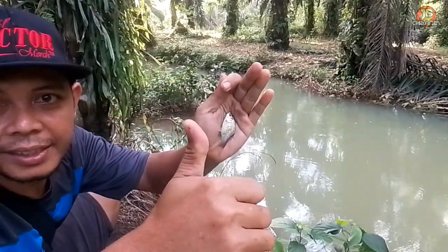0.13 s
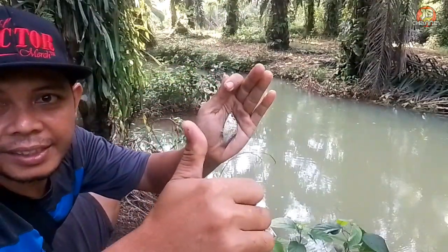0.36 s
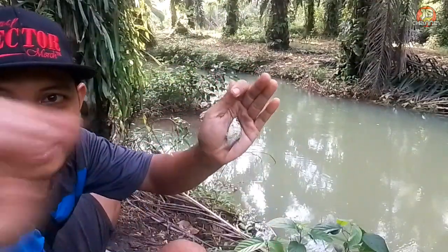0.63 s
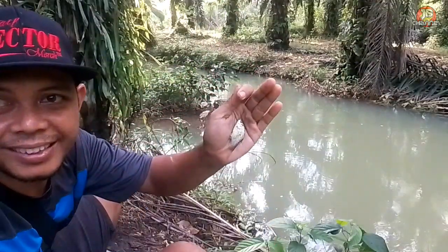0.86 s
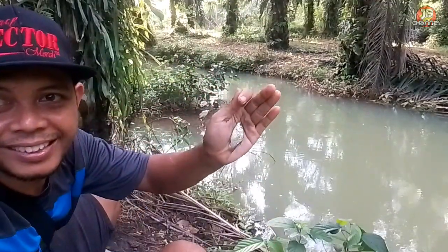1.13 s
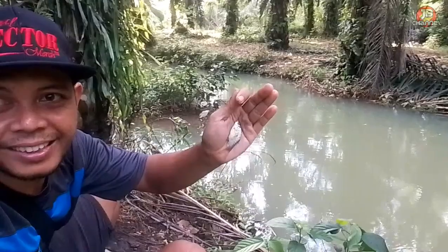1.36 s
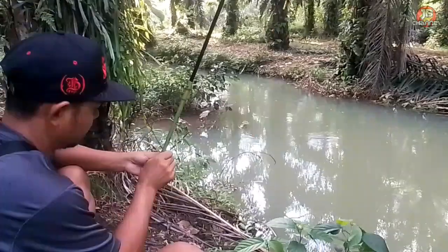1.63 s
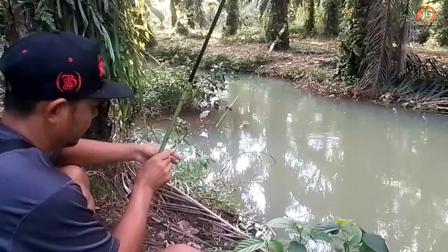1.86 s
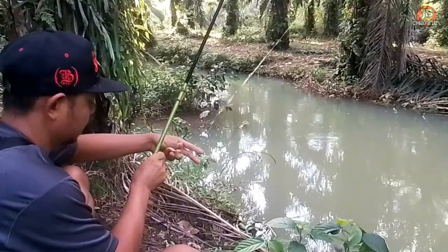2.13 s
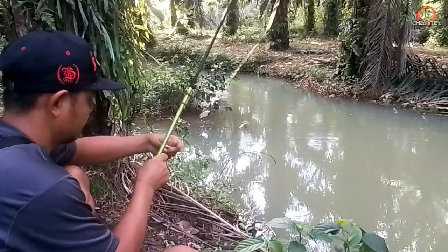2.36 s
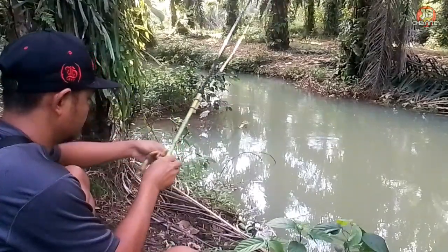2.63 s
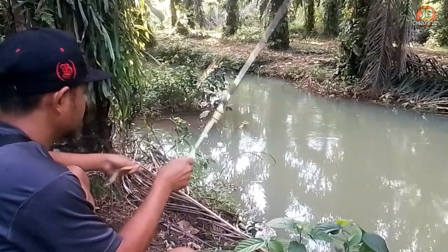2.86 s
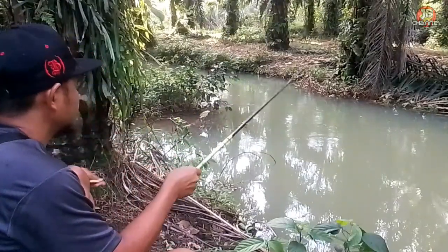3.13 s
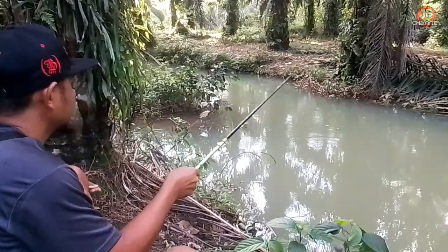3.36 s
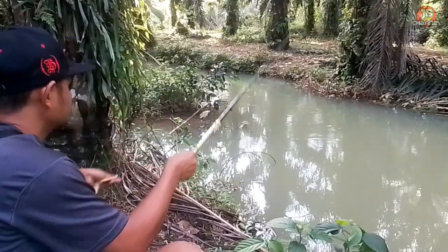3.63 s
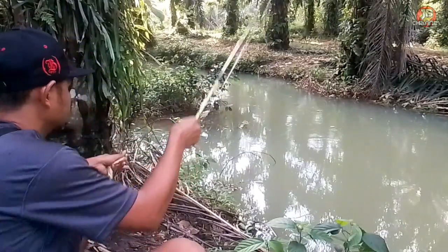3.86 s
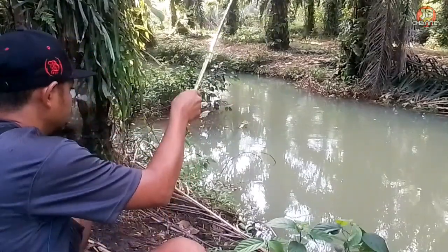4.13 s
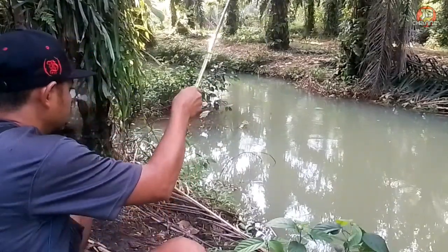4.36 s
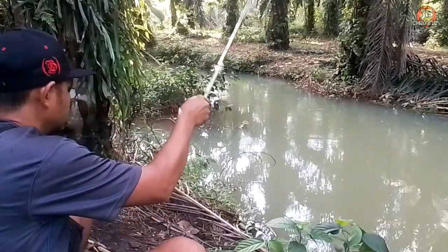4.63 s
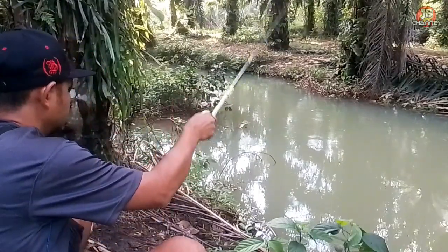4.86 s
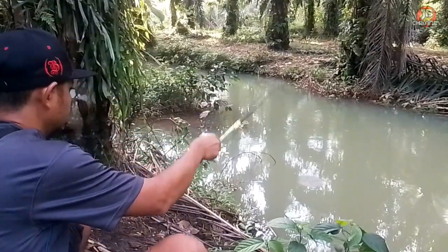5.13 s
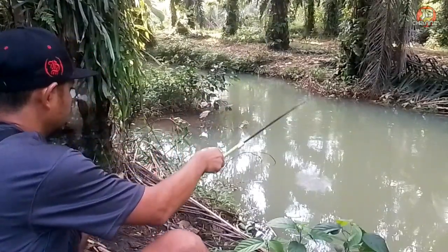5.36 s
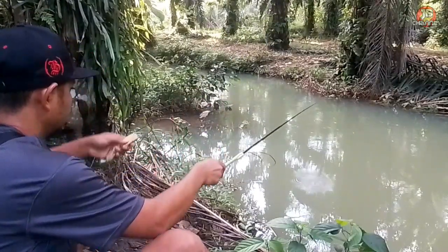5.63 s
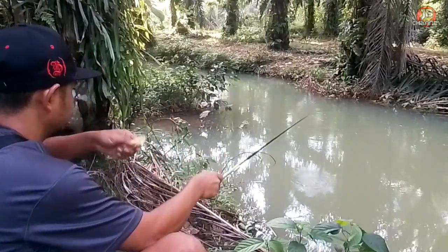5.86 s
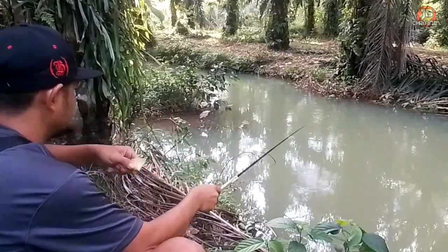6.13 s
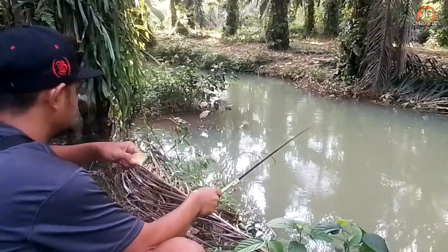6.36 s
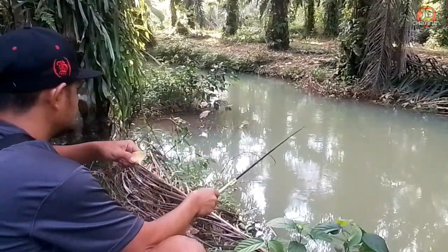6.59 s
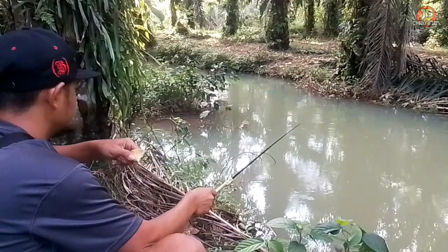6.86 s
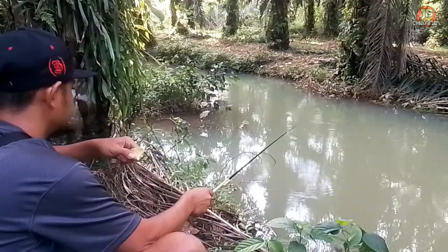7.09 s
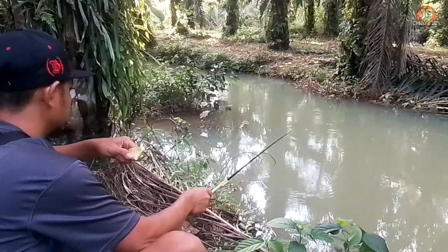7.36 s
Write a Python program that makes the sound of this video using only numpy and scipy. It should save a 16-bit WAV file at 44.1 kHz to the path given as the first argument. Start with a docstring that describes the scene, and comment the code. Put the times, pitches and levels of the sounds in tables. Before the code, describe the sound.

Daytime grove beside slow water: a pulsing cicada band, high buzz and fine cricket trill run throughout over soft air and low wind. Early, quick falling chirps and a hoarse far fowl; handling knocks and a low bump come just before a brief silent cut. The chorus fades back in with regular rising peeps and echoing far bird notes. Fishing-rod taps and rustle close near the microphone.

```python
"""Daytime grove by a slow stream

Cicadas and crickets sing in steady bands, made of pulsed noise rung by body resonances and of combs of close lines.
Small callers peep and chirp as gliding tones or blurred notes, and a far fowl crows in hoarse harmonics; all echo
off the trunks. Shaped noise makes air, far water and wind. A hand bumps, taps and rustles near the microphone as
short rings, pushes and noise grains. An edit cuts to silence and fades in."""
import sys
import numpy as np
from scipy import signal
from scipy.fft import rfft, irfft, next_fast_len
from scipy.io import wavfile
from scipy.ndimage import uniform_filter1d

SR = 44100
rng = np.random.default_rng(int(sys.argv[2]) if len(sys.argv) > 2 else 0)


def master(y):
    """Save y as 16-bit WAV."""
    cut = np.clip(np.atleast_2d(y).T, -1, 1)
    pcm = np.round(cut * 32767)  # scale
    wavfile.write(sys.argv[1], SR, pcm.astype(np.int16))


def undo_db(level):
    """Turn decibels back into plain size, where 20 dB means ten times bigger."""
    steps = np.asarray(level, float) / 20
    return 10 ** steps


N = 329906
T = np.arange(N) / SR
CUT_S = 1.4506  # the edit's hard cut

# singers' levels, a row before and a row after the cut:
# (cicadas [dB], their overtone [dB], high buzz [dB], crickets [dB], far chorus [dB])
SINGER_LEVELS = [(-62.5, -84.5, -68, -74, -70.5), (-61.5, -81.5, -67.5, -70.5, -72)]


def evened(x):
    """Scales to rms 1."""
    return x / np.sqrt(np.mean(x ** 2) + 1e-20)


def add(mix, s, sound):
    """Mixes a sound in at time s."""
    part = mix[round(s * SR):][:len(sound)]
    part += sound[:len(part)]


def curve(rows):
    """Straight lines through a table of (time [s], value)."""
    return np.interp(T, *np.transpose(rows))


def across_cut(table, column):
    """One column of a two-row table: first row before the cut, second after."""
    return np.where(T < CUT_S, table[0][column], table[1][column])


def bout(s, hold, db, rise, fall):
    """Gain that rises to db at time s, holds, and dies away; rise and fall are seconds per 60 dB."""
    late = np.maximum((s - T) / rise, (T - s - hold) / fall)
    return undo_db(db - 60 * np.maximum(0, late))


def slow(top_hz):
    """Slow chance of rms 1: sines from 0.1 Hz to top_hz, weaker as they quicken."""
    t = T[::64]
    waves = sum(np.sin(2 * np.pi * (f * t + rng.random())) / np.sqrt(f) for f in np.geomspace(.1, top_hz, 24))
    return evened(waves).repeat(64)[:N]


def body(x, modes, order=3):
    """Resonances (centre [Hz], width [Hz], level [dB]) adding in power; a high order darkens the valleys."""
    size = next_fast_len(len(x))
    hz = np.fft.rfftfreq(size, 1 / SR)
    power = sum(undo_db(2 * db) / (1 + ((hz - f) / w) ** 2) ** order for f, w, db in modes)
    return evened(irfft(rfft(x, 2 * len(hz) - 2) * np.sqrt(power))[:len(x)])


def strokes(rate, share, wander):
    """A smooth gate that opens for a share of every cycle, its rate wandering slightly."""
    turns = np.cumsum(rate * (1 + wander * slow(2.1))) / SR + rng.random()
    return np.sin(np.pi * np.minimum(turns % 1 / np.clip(share, .05, 1), 1)) ** 2


def sweep(hz, to_hz, length, bend=1):
    """A short gliding tone with soft ends."""
    u = np.arange(round(length * SR)) / (length * SR)
    glide = hz + (to_hz - hz) * u ** bend
    return np.sin(2 * np.pi * np.cumsum(glide) / SR) * np.sin(np.pi * u) ** .8


def air():
    """Air and far water: noise built from random short-time spectra with drifting patches."""
    # colour of the bed: (frequency [Hz], relative level per Hz [dB])
    colour = [(60, -33.5), (130, 2), (200, -5), (340, -10), (700, -14), (1300, -17), (2050, -22),
              (2700, -18), (3400, -26.5), (4050, -24), (5900, -30.5), (8500, -13), (9500, -36.5),
              (10300, -78), (15500, -81)]
    level_db, patchy_db = -62.5, 1.0
    frames, hz = N // 256 + 5, np.fft.rfftfreq(1024, 1 / SR)
    real, imaginary, patches = rng.standard_normal((frames, 513, 3)).T
    patches = evened(uniform_filter1d(uniform_filter1d(patches, 10, 0), 16, 1))
    f, db = np.transpose(colour)
    tilt = np.interp(np.log(hz + 1), np.log(f), db)[:, None]
    spectra = (real + 1j * imaginary) * undo_db(tilt + patchy_db * patches)
    return undo_db(level_db) * evened(signal.istft(spectra, nperseg=1024, noverlap=768)[1][:N])


def wind():
    """Wind rumble on the microphone: two bands of low noise that swell together with the gusts."""
    # a row before and a row after the cut: (deep level [dB], upper level [dB])
    levels = [(-57, -63), (-63.5, -65)]
    # slow swell of the wind: (time [s], level [dB])
    swell = [(0, -2), (.9, -1.5), (1.44, 1.5), (1.7, 0), (3.5, -0.5), (4, -0.5), (5.8, 1), (6.5, 2.5),
             (7.48, -3.5)]
    gusts = 1.0 * slow(5.2) + curve(swell)  # gusts of 1 dB rms
    deep = body(rng.standard_normal(N), [(44.3, 69, 0)])
    upper = body(rng.standard_normal(N), [(106.4, 26, 0), (150.5, 33.4, -5.5)])
    return deep * undo_db(across_cut(levels, 0) + gusts) + upper * undo_db(across_cut(levels, 1) + gusts)


def murmur():
    """Far birds blurred together: flickering noise in the band of their voices."""
    # swell before a trim of -4.5 dB: (time [s], level [dB])
    swell = [(0, -71.5), (1.04, -69), (1.44, -65), (1.7, -74.5), (2.52, -74.5), (2.87, -69), (3.31, -70.5),
             (4.03, -63.5), (4.23, -70), (5.11, -67), (5.93, -66), (6.21, -67.5), (7.0, -65.5),
             (7.48, -63.5)]
    chance = uniform_filter1d(uniform_filter1d(rng.standard_normal(N), 1500), 1500)
    flicker = undo_db(3.0 * evened(chance))
    voices = body(rng.standard_normal(N) * flicker, [(1600, 340, -2.5), (1969, 244, 1.5), (2300, 200, -10.0)])
    return voices * undo_db(curve(swell) - 4.5)


def fowl():
    """A harmonic cry whose lowest tone is lost on the way; hoarseness makes it waver and flutter."""
    # one table a cry: (time [s], relative level [dB], pitch [Hz], hoarseness [0-1])
    cries = [
        [(.315, -70, 820, .65), (.328, -57, 815, .65), (.354, -57, 795, .65), (.375, -64, 750, .65),
         (.39, -71, 810, .4), (.45, -72, 815, .3)],
        [(.74, -74, 790, .4), (.795, -70, 790, .4), (.805, -76, 735, .3), (.82, -68, 737, .3),
         (.86, -68, 755, .3), (.885, -77, 768, .3), (.915, -65, 792, .25), (.97, -66, 812, .25),
         (1.0, -74, 830, .3)],
    ]
    # harmonics heard: (multiple of the pitch, relative level [dB])
    orders = [(2, 0), (3, 0), (4, -14)]
    out = np.zeros(N)
    for rows in cries:
        s, *columns = np.transpose(rows)
        t = np.arange(s[0], s[-1], 1 / SR)
        db, hz, hoarse = (np.interp(t, s, c) for c in columns)
        chance = rng.standard_normal((len(t), 2))
        chance = uniform_filter1d(uniform_filter1d(chance, 110, 0), 80, 0)
        waver, flutter = (evened(v) for v in chance.T)
        turns = np.cumsum(hz * (1 + 0.033 * hoarse * waver)) / SR
        cry = sum(undo_db(d) * np.sin(2 * np.pi * k * turns) for k, d in orders)
        add(out, s[0], undo_db(db) * cry * (1 + hoarse * flutter) * signal.windows.tukey(len(t), .1))
    return out


def warbles():
    """Far warbles: 31 short rising beats a second, no two alike in time, level or pitch."""
    # (start [s], length [s], typical beat level before the mix [dB], pitch [Hz])
    trills = [(1.81, .11, -70, 2300), (2.234, .1, -73, 2300), (2.552, .14, -72, 2370),
              (2.932, .11, -72, 2370), (3.31, .1, -70, 2320), (3.716, .1, -72, 2300),
              (4.085, .1, -75, 2410), (4.57, .12, -70.5, 2330), (4.547, .27, -70, 1763),
              (4.839, .45, -69.5, 1680), (3.846, .4, -72.5, 1850)]
    out = np.zeros(N)
    for s, length, db, hz in trills:
        beats = np.arange(0, length, 1 / 31)
        for beat, (a, b, c) in zip(beats, rng.standard_normal((len(beats), 3))):
            centre = hz + 25 * c
            add(out, s + beat + .003 * a, undo_db(db + 3 * b) * sweep(centre - 50, centre + 50, .02))
    return out


def blurred_notes():
    """Far notes smeared into narrow noise that starts in 6 ms and falls 60 dB in half a second."""
    # level before a trim of -3 dB: (time [s], level [dB], pitch [Hz])
    notes = [(1.379, -65, 2590), (1.4398, -75, 2590), (2.494, -71, 2750), (2.8654, -70, 2800),
             (3.237, -68, 2780), (3.6042, -67.5, 2810), (3.9769, -69, 2840), (4.356, -68, 2870),
             (4.7246, -67, 2840), (5.1083, -65.5, 2820), (5.329, -70, 2770), (5.4819, -64.5, 2860),
             (5.876, -65, 2830), (6.0494, -70, 2710), (6.2586, -63.5, 2840), (6.45, -67, 2680),
             (6.6215, -63, 2870), (6.9892, -63, 2850), (7.1871, -66.5, 2730), (7.42, -63, 2860)]
    out, t = np.zeros(N), np.arange(9000) / SR
    for s, db, hz in notes:
        smear = body(rng.standard_normal(9000), [(hz, 160, 0)])
        add(out, s - .005, undo_db(db - 3) * smear * np.minimum(t / .006, 1) * undo_db(-60 * t / .5))
    return out


def peeps():
    """Rising peeps: 20 ms tones that glide up, quickest at the start."""
    # (time 5 ms into the peep [s], level [dB])
    calls = [(1.4237, -59), (1.5224, -57.5), (1.714, -57.5), (1.9021, -57.5), (2.1011, -57),
             (2.2957, -58.5), (2.4872, -56.5), (2.6778, -58.5), (2.8699, -58.5), (3.0555, -56.5),
             (3.2405, -56.5), (3.4246, -57), (3.6082, -59), (3.7963, -56), (3.9789, -60.5), (4.1759, -57),
             (4.363, -59), (4.5436, -56.5), (4.7311, -59.5), (4.9297, -55.5), (5.1133, -59), (5.2984, -58),
             (5.4904, -58.5), (5.6905, -57.5), (5.883, -57.5), (6.0801, -56.5), (6.2652, -58.5),
             (6.4467, -57.5), (6.6318, -55.5), (6.8124, -59), (6.9985, -58), (7.216, -57.5), (7.4305, -57)]
    out = np.zeros(N)
    for s, db in calls:
        add(out, s - .005, undo_db(db) * sweep(1800, 2230, .02, bend=.55))
    return out


def chirp_runs():
    """Runs of steeply falling chirps, evenly spaced, the first of each run softer."""
    # (first chirp [s], last chirp [s], level after the first [dB], top pitch [Hz], chirp length [s])
    runs = [(.0712, .1421, -62, 6120, .014), (.2967, .3666, -61, 6130, .014),
            (.5187, .5886, -62.5, 6100, 0.016), (.7756, .8111, -61, 6110, 0.015),
            (.9637, 1.034, -57, 6120, 0.015), (3.672, 3.7063, -55, 5640, 0.027),
            (3.866, 3.943, -54, 5570, .025), (4.062, 4.134, -53.5, 5640, 0.027),
            (4.298, 4.372, -53, 5590, .025), (4.4887, 4.529, -53, 5600, 0.026)]
    gap_s, fall_hz_per_s, first_db = .036, 47500, -4.5
    lead = .3  # share of a chirp that sounds ahead of its listed time
    out = np.zeros(N)
    for first, last, db, hz, length in runs:
        chirp = sweep(hz, hz - fall_hz_per_s * length, length)
        times = np.linspace(first, last, round((last - first) / gap_s) + 1)
        for k, s in enumerate(times):
            add(out, s - lead * length, undo_db(db + first_db * (k == 0)) * chirp)
    return out


def grove(x, t60=0.89, gap=.012):
    """Echoes off trunks and bank: sparse taps of random sign dying away; paths shift as leaves and callers move."""
    out = 0
    for k in range(3):  # three echo patterns fade into one another
        at = np.arange(0, SR, 22) + rng.integers(0, 22, (SR + 21) // 22)
        echoes = np.zeros(2 * SR)
        echoes[at + round(gap * SR)] = rng.choice([-1., 1.], len(at)) * undo_db(-60 * at / SR / t60)
        window = np.sqrt(2 / 3) * np.cos(np.pi * (T / .61 + k / 3))  # the three squares sum to one
        out = out + signal.fftconvolve(x * window, echoes / np.linalg.norm(echoes))[:N]
    return out


def rubbing():
    """Cloth rustle and a hand sliding on the rod: grainy noise in broad bands, swelling and dying."""
    # hand on the rod: (time [s], level [dB])
    scuffs = [(7.085, -60), (7.195, -56), (7.38, -68), (7.42, -66), (7.464, -48.5)]
    # cloth: (time [s], hold [s], level [dB], rise over 60 dB [s], fall over 60 dB [s])
    rustles = [(1.128, .05, -62, .01, .3), (5.68, .15, -74, .1, .3), (7.06, .03, -70, .1, .3),
               (7.2, 0, -65, .1, .23), (7.465, .02, -60, .15, .2)]
    grit = uniform_filter1d(rng.exponential(1, N // 64 + 1).repeat(64)[:N], 64)
    grains = rng.standard_normal(N) * undo_db(1.5 * grit)
    rod = body(grains[::-1], [(345, 270, 0), (870, 230, 0)])
    cloth = body(grains, [(390, 270, -3), (1240, 2500, 1.5), (3240, 3400, 0), (10500, 10000, -38)])
    rod = rod * sum(bout(s, 0, db, .07, .11) for s, db in scuffs)
    return rod + cloth * sum(bout(*row) for row in rustles)


def taps():
    """Hand and rod: short rings, each with a noisy crack; a lower ring swells and dies more slowly."""
    # (time [s], level [dB], ring [Hz], crack relative to the ring [dB])
    hits = [(1.085, -49, 2300, -20), (1.126, -46, 2380, 0), (1.3587, -39, 1600, -25),
            (5.69, -50, 2500, -10), (5.698, -47, 2300, -10), (5.721, -53, 3000, 1), (5.766, -52, 3000, -15),
            (5.853, -52, 2980, -6), (7.085, -56, 950, -20), (7.097, -54, 750, -24), (7.192, -53, 980, -18),
            (7.201, -47, 980, -10), (7.378, -47.5, 750, -18), (7.42, -54, 816, -20), (7.443, -53, 825, -18),
            (7.4605, -33.5, 807, -24), (7.474, -50, 486, -16)]
    out, t = np.zeros(N), np.arange(1500) / SR
    lowpass = signal.butter(3, 5000, fs=SR)
    cracks = evened(signal.lfilter(*lowpass, rng.standard_normal((len(hits), 1500))))
    for (s, db, hz, crack_db), crack in zip(hits, cracks):
        contact = 0.45 / hz  # the ring's envelope peaks after 0.45 cycles
        ring = t / contact * np.exp(1 - t / contact) * np.sin(2 * np.pi * hz * t)
        add(out, s, undo_db(db) * (ring + undo_db(crack_db - 60 * t / 0.0061) * crack))
    return out


def bump():
    """One low push on the microphone: a quick dip of pressure, then a longer rebound."""
    # (level [dB], push [s], rebound [s], rebound relative to the push [dB])
    db, push, rebound, rebound_db = (-36.5, .0046, .012, -3)
    start_s = 1.1258
    out, t = np.zeros(N), np.arange(1500) / SR

    def lobe(length, skew):
        return np.sin(np.pi * np.minimum(t / length, 1) ** skew)

    add(out, start_s, -undo_db(db) * lobe(push, 1))
    add(out, start_s + push, undo_db(db + rebound_db) * lobe(rebound, 0.42))
    return out


def crickets():
    """Even wing strokes ring a narrow wing, so each song is a comb of close lines; far ones blur to noise."""
    # (one line [Hz], strokes [per s], wing resonance [Hz], width [Hz], relative level [dB])
    songs = [(4188, 76.2, 4235, 70, 0), (4350, 38.2, 4335, 50, -2), (4409, 44, 4420, 50, -8)]
    # swell of the whole choir: (time [s], level [dB])
    swell = [(0, .3), (1, -3), (1.44, 5), (1.7, .3), (3.1, -0.5), (4.4, 1.5), (4.8, 0.8), (7.48, -1.5)]
    choir = 1.5 * body(rng.standard_normal(N), [(4335, 200, 0)], order=6)
    for line, rate, hz, width, db in songs:
        drift = np.cumsum(3.5 * slow(8)) / SR  # 3.5 Hz rms, shared by the lines of a song
        for f in line + rate * np.arange(-3, 4):
            wing = 1 / (1 + ((f - hz) / width) ** 4)
            choir += undo_db(db + 3.0 * slow(3)) * wing * np.sin(2 * np.pi * (f * T + drift))
    return evened(choir) * undo_db(across_cut(SINGER_LEVELS, 3) + curve(swell))


def low_singer():
    """A faint singer just below the crickets: a narrow noise band that slowly swells and fades."""
    # (time of the peak [s], level [dB])
    swells = [(3.0, -77), (4.3, -76), (5.7, -84)]
    band = body(rng.standard_normal(N), [(4070, 150, 0)])
    return band * sum(bout(s, 0, db, 1.1, 1.1) for s, db in swells)


def far_chorus():
    """Far singers blurred into one fluttering noise band."""
    # (centre [Hz], width [Hz], relative level [dB])
    modes = [(4740, 590, -3), (5270, 340, -5), (5600, 130, -14)]
    # (time [s], level [dB])
    swell = [(0, 0.5), (1.44, -3), (1.7, 4), (2.1, -2), (3.1, -0.2), (4.9, -3.5), (5.8, -3), (7.48, 2)]
    band = body(rng.standard_normal(N) * undo_db(1.6 * slow(11)), modes, order=5)
    return band * undo_db(across_cut(SINGER_LEVELS, 4) + curve(swell))


def rasp():
    """A rasping singer near 5.5 kHz: noise pulsed 28 times a second."""
    # (time [s], hold [s], level [dB])
    bouts = [(0, 1.1, -79), (1.85, .2, -73), (7.2, .3, -70.5)]
    pulsed = rng.standard_normal(N) * (1 + strokes(28, .6, .02))
    band = body(pulsed, [(5300, 450, 0), (5700, 350, -1)], order=4)
    return band * sum(bout(*row, .7, 0.32) for row in bouts)


def high_buzz():
    """A high buzz: noise beaten about 135 times a second over an unpulsed floor, rung by a body."""
    # (centre [Hz], width [Hz], relative level [dB])
    modes = [(8500, 310, -2), (8020, 500, -0.5), (8700, 150, -2), (9524, 425, -17), (8920, 450, -7.5)]
    # (time [s], level [dB])
    swell = [(0, 0), (1, -1), (1.2, 3), (1.44, 3), (1.7, 1), (3.1, 2), (4.4, -3), (5, -2), (5.8, -0.5),
             (7.48, 0.5)]
    beats = evened(strokes(135.5, .6, .003)) * undo_db(3 * slow(2)) + 3.2
    buzz = body(beats * rng.standard_normal(N), modes, order=5)
    return buzz * undo_db(across_cut(SINGER_LEVELS, 2) + curve(swell))


def cicadas():
    """Ribs buckle in bursts, four to a group, and ring the body; far singers blur to noise in the same bands."""
    # body resonances after the cut: (centre [Hz], width [Hz], relative level [dB])
    ribs = [(7217, 184, 7.5), (6966, 530, 3.5), (7900, 62, -10.5), (7010, 310, -14.5)]
    # a lower mix of singers before the cut: (centre [Hz], width [Hz], relative level [dB])
    ribs_before = [(7170, 220, 4), (6970, 540, 5), (7960, 62, -10), (7010, 310, -14)]
    # overtone band after the cut: (centre [Hz], width [Hz], relative level [dB])
    top = [(14520, 330, 0), (13950, 550, -7), (13400, 350, -15), (15000, 250, -16), (15300, 170, -12)]
    # overtone band before the cut: (centre [Hz], width [Hz], relative level [dB])
    top_before = [(14400, 300, -1), (14000, 350, 0), (13400, 350, -9), (14950, 250, -9), (15300, 170, -7)]
    # the singers' swell: (time [s], level [dB])
    effort = [(0, -2), (.6, 0.5), (1.44, -1.5), (1.8, 0.5), (3.1, 0.5), (4.4, 0.5), (4.8, 0.5), (5.8, 0.2),
              (7.2, -0.2), (7.48, 1.5)]
    groups = np.cumsum(19.85 * (1 + .008 * slow(2))) / SR  # 19.85 groups a second, wandering
    bursts = .5 + np.cos(4 * np.pi * groups) ** 2
    gate = evened(bursts * (1 + .7 * np.cos(2 * np.pi * groups)))

    def song(modes, far):
        return body((gate + far) * rng.standard_normal(N), modes, order=4)

    main = np.where(T < CUT_S, song(ribs_before, 1.5), song(ribs, 1.5))
    overtone = np.where(T < CUT_S, song(top_before, 1.4), song(top, 1.4))
    main = main * undo_db(across_cut(SINGER_LEVELS, 0) + curve(effort) + .8 * slow(6))
    return main + overtone * undo_db(across_cut(SINGER_LEVELS, 1) + curve(effort))


def scene():
    """All sources at one microphone, with the callers and the fowl echoing in the grove."""
    callers = murmur() + blurred_notes() + peeps() + chirp_runs()
    far_callers = warbles()
    cry = fowl()
    echoes = grove(undo_db(-3.5) * callers + far_callers + undo_db(-9.5) * cry)
    voices = callers + undo_db(2.0) * far_callers + cry + echoes
    singers = crickets() + low_singer() + far_chorus() + rasp() + high_buzz() + cicadas()
    handling = rubbing() + taps() + bump()
    return (air() + wind() + voices + handling + singers)[None]


def top_cut(x):
    """Nothing passes above the cut-off."""
    return signal.sosfilt(signal.butter(12, 16230, fs=SR, output="sos"), x)


def record(dry):
    """The converter adds a steady offset; the edit cuts both to silence, then fades them in straight."""
    offset = .0093  # of full scale
    fade_from_s, fade_s = 1.495, .165
    fade_in = np.clip((T - fade_from_s) / fade_s, 0, 1)
    edit = np.where(T < CUT_S, 1, fade_in)
    return top_cut((dry + offset) * edit)


dry = scene()
out = record(dry)
master(out)
```